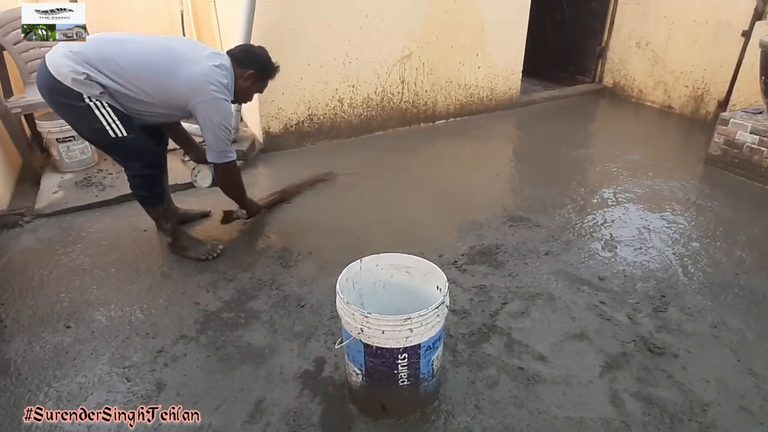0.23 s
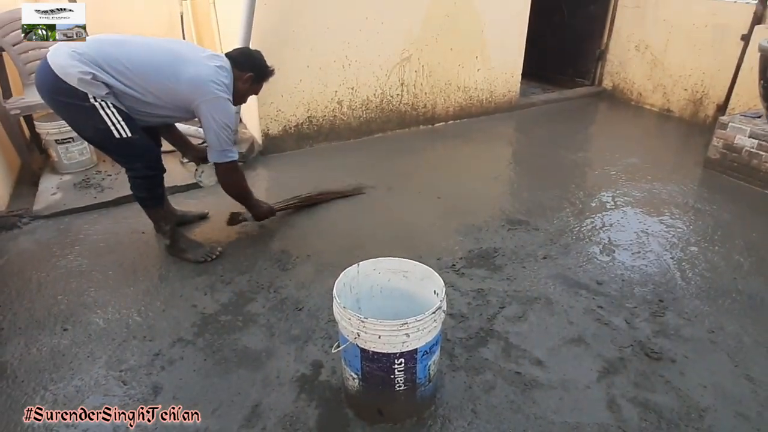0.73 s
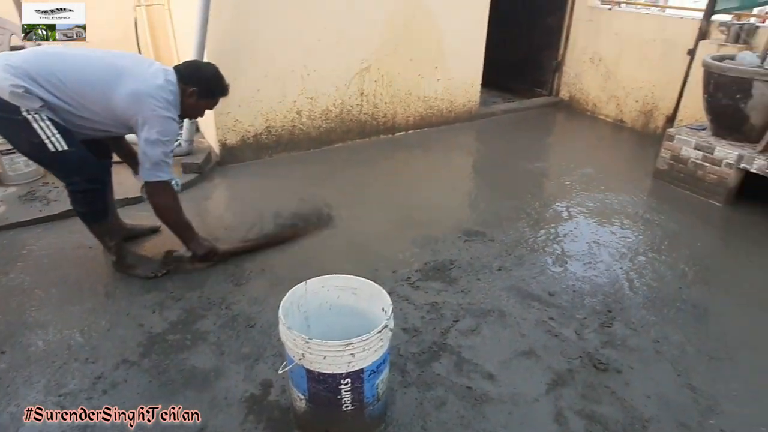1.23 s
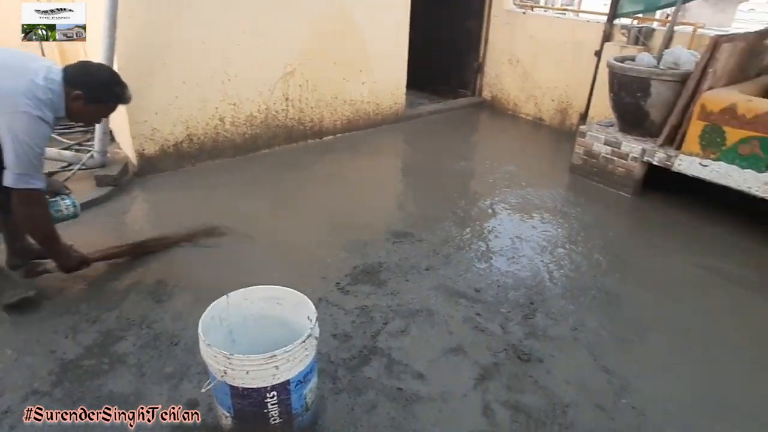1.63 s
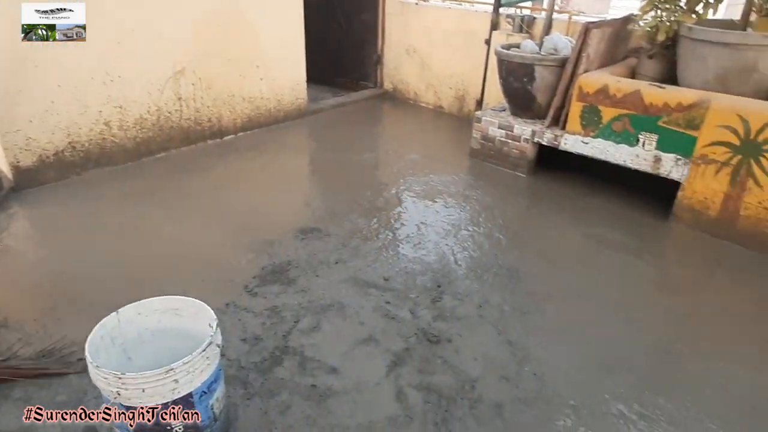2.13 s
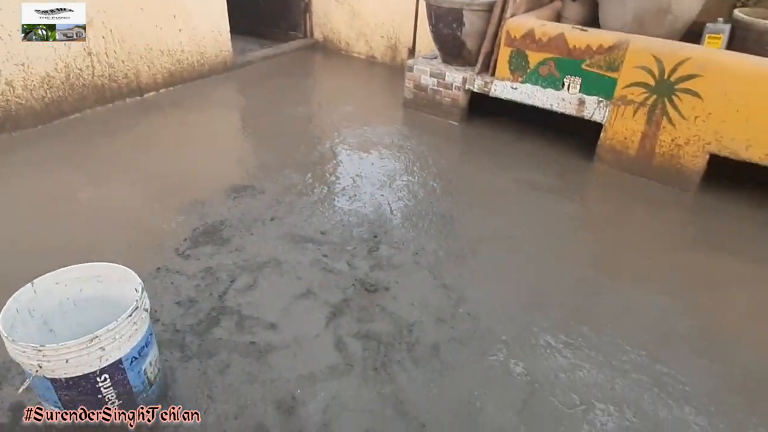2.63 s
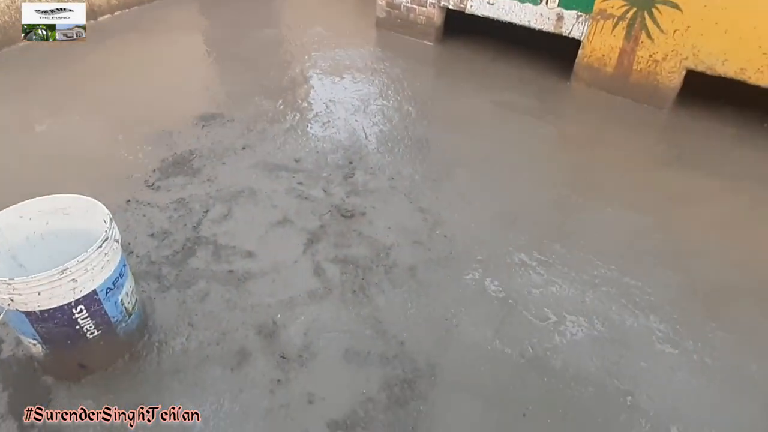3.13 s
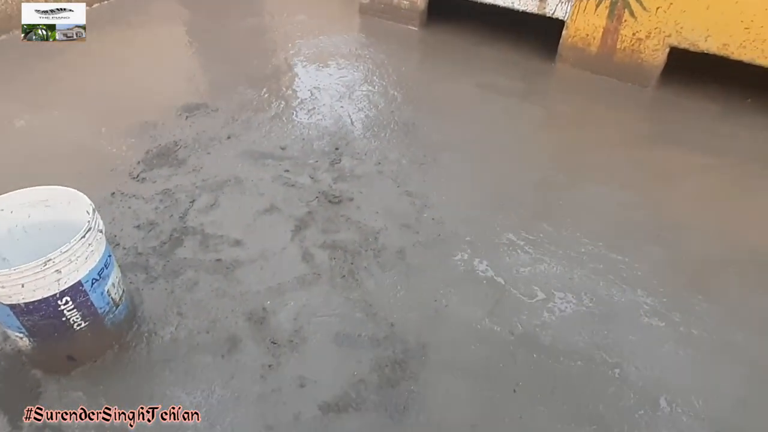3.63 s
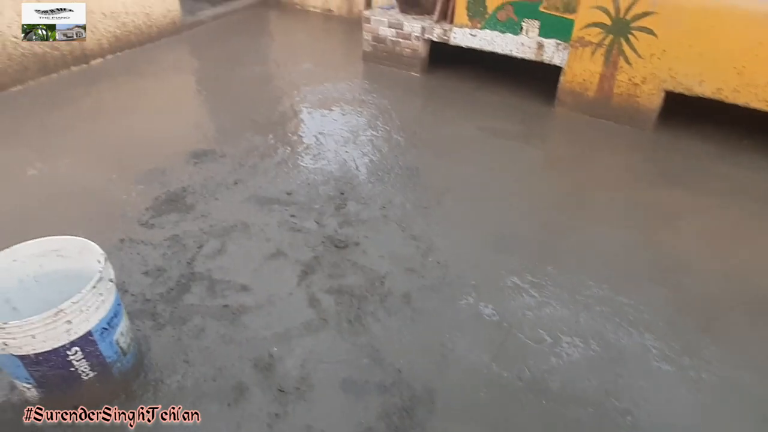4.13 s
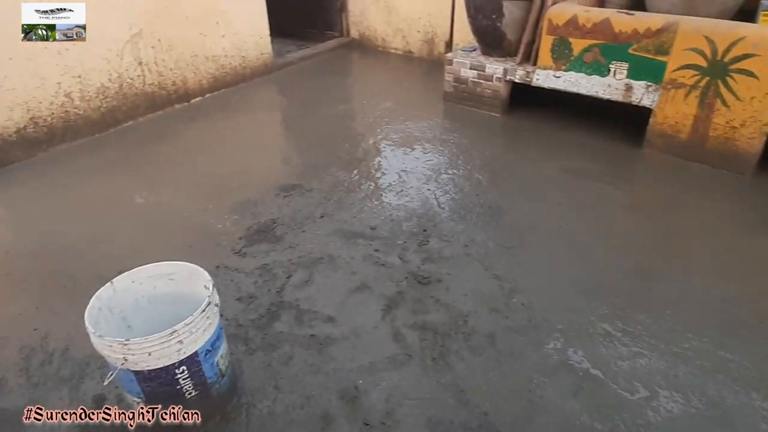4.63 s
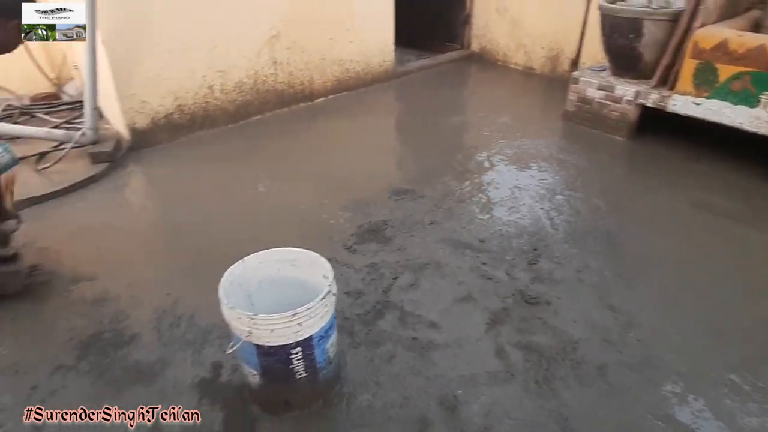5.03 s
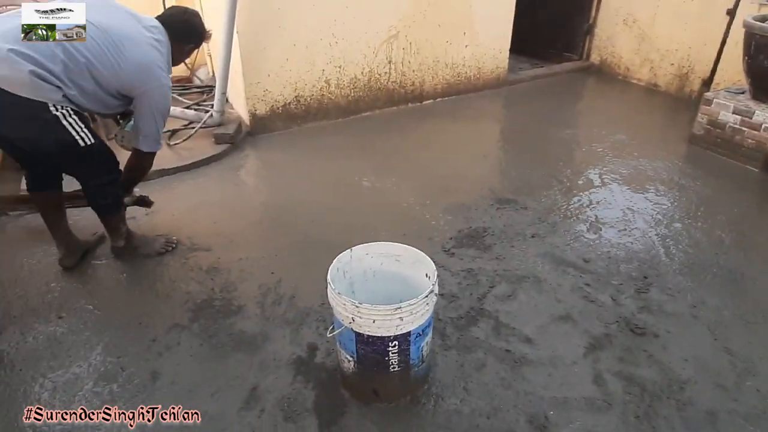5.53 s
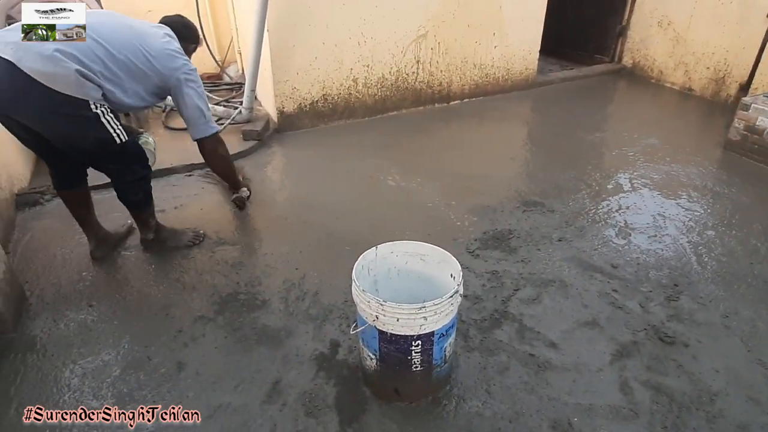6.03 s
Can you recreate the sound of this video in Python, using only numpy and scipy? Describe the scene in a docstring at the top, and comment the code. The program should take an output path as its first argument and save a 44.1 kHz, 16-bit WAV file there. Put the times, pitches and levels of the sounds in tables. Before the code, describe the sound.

Close to the left, a stiff twig broom sweeps wet cement slurry in regular raspy strokes with a watery swish, gurgle and small squelches. Sweeping stops, the broom slaps down once, sharp and dry, and tiny wet specks tick. A few more irregular strokes follow with splats. Town traffic rumbles faintly below; a distant engine drones, swelling near the end. Low walls add a brief outdoor echo.

```python
"""A stiff twig broom sweeps wet cement slurry over a walled roof terrace, mostly to the left.
From the start, town traffic rumbles below, made of filtered noise. Twigs scratch over grit (random tiny
impulses) and push a swishing, gurgling film of slurry (wavering resonances), with a few squelches.
In a pause at 3.6 s the broom slaps down once and wet specks tick; the walls answer briefly throughout.
Sweeping resumes at 4 s, when a distant engine (a stack of sines) rises; it swells again near the end."""
import sys
import numpy as np
from scipy import signal
from scipy.fft import rfft, irfft, next_fast_len
from scipy.io import wavfile
from scipy.ndimage import uniform_filter1d

SR = 44100
rng = np.random.default_rng(int(sys.argv[2]) if len(sys.argv) > 2 else 0)


def master_out(mix):
    """Clip the mix to full scale and print it as 16-bit PCM to the path in sys.argv[1]."""
    frames = np.transpose(np.atleast_2d(mix))
    ceiling = np.clip(frames, -1, 1)
    pcm = np.round(ceiling * 32767).astype(np.int16)
    wavfile.write(sys.argv[1], SR, pcm)


N = 277477
TIME = np.arange(N) / SR
EDGE_HZ = 16000  # top of the sound's band


def gain_of(db):
    """Turns decibels into amplitude."""
    return 10 ** (np.asarray(db) / 20)


def evened(x):
    """Scales a sound to an average strength (rms) of 1."""
    return x / np.sqrt(np.mean(x ** 2) + 1e-20)


def read(points, hz):
    """Reads a frequency table between its points, on a logarithmic frequency axis."""
    f, value = np.transpose(points)
    return np.interp(np.log(hz + 1), np.log(f + 1), value)


def follow(rows):
    """Draws each column of a time table as a curve over all samples."""
    s, *columns = np.transpose(rows)
    return [np.interp(TIME, s, column) for column in columns]


def filtered(x, gain):
    """Multiplies each frequency of x by gain(frequency)."""
    size = next_fast_len(N + 4096)
    spectrum = rfft(x, size)
    return irfft(spectrum * gain(np.fft.rfftfreq(size, 1 / SR)), size)[..., :N]


def coloured(x, points):
    """Gives x the spectrum of a table, keeping the power that white noise would have."""
    even_hz = np.linspace(0, EDGE_HZ, 2 ** 10)
    power = np.mean(gain_of(read(points, even_hz)) ** 2)
    shaped = filtered(x, lambda hz: gain_of(read(points, hz)) * (hz < EDGE_HZ))
    return shaped / np.sqrt(power * 2 * EDGE_HZ / SR)


def wander(hz):
    """A smooth random curve of rms 1; changes faster than about hz are filtered away."""
    return evened(filtered(rng.standard_normal(N), lambda f: 1 / (1 + (f / hz) ** 4)))


def resonate(x, hz, width):
    """A steep resonance, width in Hz, whose pitch follows the curve hz."""
    turn = np.exp(2j * np.pi * np.cumsum(hz * np.ones(N)) / SR)
    r = np.exp(-np.pi * width / SR)
    # shift the pitch down to zero, smooth there, and shift back up
    return (turn * signal.lfilter([(1 - r) ** 2], [1, -2 * r, r * r], x / turn)).real


def slips(per_s, spread_db):
    """Random tiny impulses of uneven size, each with its own strength on the left and on the right."""
    size = gain_of(spread_db * np.minimum(rng.exponential(1, N), 4))
    happens = rng.random(N) < per_s / SR
    return evened(size * happens * rng.standard_normal((2, N)))


def pops(per_s, spread_db, low_hz, high_hz, cycles, count=24):
    """Sparse short rings, each at one of count pitches, fading over a few cycles."""
    t, out = np.arange(2 ** 9) / SR, 0
    for hz in np.geomspace(low_hz, min(high_hz, EDGE_HZ), count):
        ring = evened(np.sin(2 * np.pi * hz * t) * np.exp(-t * hz / cycles))
        hits = slips(per_s / count, spread_db)
        out = out + signal.oaconvolve(hits, ring[None], axes=1)[:, :N]
    return evened(out)


def drifting(x, patchy_db):
    """Lets the colour shift in random patches some hundreds of Hz wide."""
    z = signal.stft(x, nperseg=512)[2]
    patches = rng.standard_normal(z.shape[1:])
    patches = uniform_filter1d(patches, size=6, axis=0)  # smooth over frequency
    patches = evened(uniform_filter1d(patches, size=9, axis=1))  # smooth over time
    return evened(signal.istft(z * gain_of(patchy_db * patches), nperseg=512)[1][:, :N])


def burst(s, db, rise, fall):
    """Envelope of many twigs or drops landing almost together."""
    distance = np.maximum((s - TIME) / rise, (TIME - s) / fall)
    return gain_of(db) * np.exp(-distance.clip(0, 40))


# colour of the traffic: (frequency [Hz], relative level [dB])
TOWN_COLOUR = [(20, -34.5), (40, -13.5), (58, -7), (80, 0.5), (128, -1.5), (158, -9.5), (195, -5),
               (320, -7), (450, -11.5), (750, -15.5), (1300, -21.5), (3500, -30.5), (4800, -39.5),
               (16000, -48.5)]
# how alike left and right are: (frequency [Hz], likeness [0-1])
TOWN_LIKENESS = [(60, 0.99), (130, 0.95), (280, 0.87), (500, 0.58), (800, 0), (16000, 0)]
# slow rise and fall of the traffic: (time [s], added level [dB])
TOWN_SWELL_CURVE = [(0, 4.5), (1.5, 3), (2.5, 1.5), (3.4, 1), (4.1, 3.5), (5.1, 1.5), (5.8, 8), (6.29, 5)]
TOWN_BASE_DB = -49.5  # before the swell is added


def town():
    """Far traffic: a rumble alike on both sides, with a thin unrelated hiss."""
    left, other = rng.standard_normal((2, N))
    same = lambda hz: np.clip(read(TOWN_LIKENESS, hz), 0, 1)
    right = filtered(left, same) + filtered(other, lambda hz: np.sqrt(1 - same(hz) ** 2))
    rumble = evened(coloured(np.array([left, right]), TOWN_COLOUR))
    lumps_db = 0.7 * wander(hz=6)
    return gain_of(TOWN_BASE_DB + follow(TOWN_SWELL_CURVE)[0] + lumps_db) * rumble


# the engine's course, before a slight waver: (time [s], firing rate [Hz], level [dB])
ENGINE_COURSE = [(0, 57.9, -68), (3.65, 56.06, -62), (3.85, 56.45, -50), (4.05, 57.26, -47),
                 (4.3, 53.45, -51), (4.6, 56.6, -49), (4.95, 54.24, -56.5), (5.27, 55.4, -57),
                 (5.45, 58.14, -40), (5.65, 60.64, -38), (5.9, 60.9, -40), (6.1, 58, -49),
                 (6.29, 55.66, -61)]
# overtones of the exhaust: (multiple of the firing rate, relative level [dB])
EXHAUST_TONES = [(1, 1.5), (2, -18), (3, -10.5), (4, -20), (5, -21), (6, -17.5)]


def engine():
    """A distant exhaust drones at multiples of its firing rate; the higher ones flutter more."""
    hz, db = follow(ENGINE_COURSE)
    turns = np.cumsum(hz * (1 + 0.0063 * wander(hz=14.2))) / SR
    drone = 0
    for multiple, tone_db in EXHAUST_TONES:
        flutter = 1 + 0.15 * multiple * wander(hz=3.3)
        tone = np.sin(2 * np.pi * (multiple * turns + rng.random()))
        drone = drone + gain_of(tone_db) * flutter * tone
    return gain_of(db) * evened(drone)


# how long echoes last: (frequency [Hz], time to fall by 60 dB [s])
TERRACE_DECAY = [(200, 0.43), (1500, 0.46), (5000, 0.22), (15000, 0.086)]


def terrace(x, wet_db):
    """Adds scattered echoes from the low walls, which die quickly under the open sky."""
    t = np.arange(SR // 2) / SR
    taps = rng.standard_normal((2, len(t))) * (1 - np.exp(-t / 0.014))
    hz, at, z = signal.stft(taps, SR, nperseg=256)
    fade_db = -60 * at / read(TERRACE_DECAY, hz)[:, None]
    tail = signal.istft(z * gain_of(fade_db), SR, nperseg=256)[1]
    echoes = signal.fftconvolve(x, tail / np.linalg.norm(tail[0]), axes=1)[:, :N]
    return x + gain_of(wet_db) * echoes


# lean of each pitch range: (frequency [Hz], left minus right [dB])
LEAN_COLOUR = [(300, -3.5), (1200, -4), (2400, 0.5), (4400, 2), (8000, 5.5), (10500, 2), (13000, 8)]
# slow change of the lean: (time [s], added left minus right [dB])
LEAN_TURN = [(0, 1), (1, 2.3), (2, 2), (2.8, 2.5), (4.3, 3.5), (4.8, 3.2), (5.8, 3)]


def from_left(x):
    """Places the work to the left: its treble is weaker on the right, and the lean slowly changes."""
    side = np.array([[1], [-1]]) / 2
    gains = lambda hz: gain_of(side * read(LEAN_COLOUR, hz))
    # divide by the average of both sides so that the colour of the whole stays
    shaded = filtered(x, lambda hz: gains(hz) / np.sqrt(np.mean(gains(hz) ** 2, axis=0)))
    return shaded * gain_of(side * follow(LEAN_TURN)[0])


# single sharp drops: (time [s], level before echo and lean [dB], pitch [Hz], ring time [s])
SHARP_DROPS = [(3.709, -31, 14000, .0003), (3.887, -36, 9050, .0001), (4.848, -17, 13700, 0.00025),
               (5.18, -24, 11000, 0.00021), (5.219, -18, 12340, 0.00013), (5.497, -39, 4700, 0.0006)]


def drops():
    """Each drop is a sine that rings for a few cycles."""
    out = np.zeros((2, N))
    for s, db, hz, ring in SHARP_DROPS:
        age = np.maximum(TIME - s, 0)
        out += gain_of(db) * np.sin(2 * np.pi * hz * age) * np.exp(-np.minimum(age / ring, 20))
    return out


# wet splats and twig flicks: (time [s], relative level [dB], fall [s])
SPLAT_EVENTS = [(2.222, -41, .003), (2.243, -40, .0047), (3.413, -48, .0069), (3.453, -47, 0.0038),
                (3.557, -47, .018), (3.708, -37.5, 0.012), (4.054, -45, .0055), (4.392, -35, .005),
                (4.530, -46, 0.013), (4.643, -27, 0.011), (4.887, -37, .01), (4.931, -42, .0032),
                (5.082, -50, .01), (5.091, -47.5, .018), (5.147, -45, .011), (5.163, -41.5, .009),
                (5.179, -41, 0.029), (5.235, -44.5, 0.0071), (5.490, -50, .012), (5.526, -53, .01),
                (5.550, -48.5, .02), (5.647, -35, .012), (6.222, -45, .009), (6.276, -46, .003)]
# colour of splats and crackle: (frequency [Hz], relative level [dB])
SPLAT_SPECTRUM = [(300, -21), (1200, -19), (2200, -14), (4000, -7.5), (7000, -7.5), (10000, -8),
                  (13000, -5.5), (16000, -10)]
# stirred slurry crackles: level under the stirring, decay time, level at rest
SETTLE_DB, SETTLE_S, STILL_DB = -22.5, 0.16, -79.5


def splats(stirring):
    """Small wet spatters, over the faint crackle of slurry settling after it is stirred."""
    level = sum(burst(s, db, 0.0015, fall) for s, db, fall in SPLAT_EVENTS)
    spatter = gain_of(-2.0) * level * slips(per_s=22000, spread_db=1.5)
    keep = np.exp(-1 / (SETTLE_S * SR))
    stirred = stirring + gain_of(10.5) * level
    settling = gain_of(SETTLE_DB) * signal.lfilter([1 - keep], [1, -keep], stirred)
    crackle = (gain_of(STILL_DB) + settling) * slips(per_s=3500, spread_db=0.5)
    return coloured(spatter + crackle, SPLAT_SPECTRUM)


# the blow, its echo off the wall, the thrown spray: (time [s], relative level [dB], rise [s], fall [s])
SLAP_PARTS = [(3.5943, -12, .0038, .004), (3.609, -24.5, .005, .01), (3.641, -40.5, .014, .032)]
# colour of the slap: (frequency [Hz], relative level [dB])
SLAP_SPECTRUM = [(100, -22), (250, -7), (480, -10.5), (700, -4), (950, -19), (1400, -10.5), (2300, -2.5),
                 (3300, -9), (4400, -2.5), (6600, -5.5), (8400, -4), (15000, -6), (16000, -34)]


def slap():
    """The whole bundle lands on the wet floor within a few milliseconds: bursts of dense impulses."""
    level = sum(burst(*row) for row in SLAP_PARTS)
    return coloured(level * slips(per_s=42000, spread_db=0.0), SLAP_SPECTRUM)


# twigs catching a thicker lump: (time [s], relative level [dB], pitch [Hz], width [Hz], half length [s])
SQUELCH_EVENTS = [(0.171, -35.5, 1100, 420, 0.031), (.86, -43, 1310, 700, .018),
                  (1.25, -31, 4640, 3500, 0.026), (1.968, -32, 2030, 450, .015),
                  (2.437, -40.5, 1600, 500, .04), (2.662, -40, 1760, 700, .025),
                  (3.075, -41, 1950, 600, .025)]


def squelches():
    """A lump of slurry rings briefly as the twigs tear through it."""
    tearing = slips(per_s=6000, spread_db=1.0)
    out = 0
    for s, db, hz, width, length in SQUELCH_EVENTS:
        swell = np.exp(-np.minimum(((TIME - s) / length) ** 2 / 2, 20))
        out = out + gain_of(db) * swell * evened(resonate(tearing, hz, width))
    return out


# a stroke swells from this level as the twigs bend, and sinks back to it as they lift
EDGE_DB, PRESS_SHAPE, LIFT_SHAPE = -15.5, 2.16, 2.12
# the first twigs graze before the landing, the last trail off after the lift
TOUCH_DB_PER_S, TRAIL_DB_PER_S = 430, 190
# losses per stroke length: level and fizz away from the fastest moment,
# swish and gurgle away from the wettest spot
SLOWING_DB, DULLING_DB = 4, 6
SWISH_DRAIN_DB, GURGLE_DRAIN_DB = 13.5, 12.5


def stroke(start, press, hold, lift, db, fizz_db, fastest,
           swish_hz, swish_db, gurgle_hz, gurgle_db, wettest):
    """One stroke: press, hold, lift; brightest where it is fastest, swishing where slurry is deepest."""
    age, length = TIME - start, press + hold + lift
    pressing = np.clip(1 - age / press, 0, 3)
    lifting = np.clip((age - press - hold) / lift, 0, 1)
    sag_db = EDGE_DB * (pressing ** PRESS_SHAPE + lifting ** LIFT_SHAPE)
    before, after = np.maximum(-age, 0), np.maximum(age - length, 0)
    off_floor_db = TOUCH_DB_PER_S * before + TRAIL_DB_PER_S * after
    along = np.clip(age / length, 0, 1)
    slower, drier = abs(along - fastest), abs(along - wettest)
    return (gain_of(db + sag_db - off_floor_db - SLOWING_DB * slower),
            fizz_db - DULLING_DB * slower,
            np.full(N, swish_hz), swish_db - SWISH_DRAIN_DB * drier,
            np.full(N, gurgle_hz), gurgle_db - GURGLE_DRAIN_DB * drier)


# broom strokes: (landing [s], press [s], hold [s], lift [s], relative level [dB], fizz share [dB],
#   fastest moment [0-1 of the stroke], swish pitch [Hz], relative swish [dB],
#   gurgle pitch [Hz], relative gurgle [dB], wettest spot [0-1 of the stroke])
BROOM_STROKES = [ (-.207, 0.084, .047, .142, -28, -9, .53, 2400, -6, 1050, -11, .37),
                 (.05, .103, .05, .255, -28, -6.7, .28, 2620, -3, 1080, -7, .32),
                 (0.458, .09, .027, .159, -28, -4.5, 0.48, 2870, 1, 1250, -11, 0),
                 (0.726, 0.088, 0.097, .131, -32.5, -7, 0.44, 2520, -1.5, 1211, -7, 0.39),
                 (1.049, 0.12, 0.098, .18, -25.5, -4.5, 0.58, 2360, -21, 1180, -12, 0.67),
                 (1.473, 0.12, 0.071, .181, -27.5, -4.5, .78, 1980, -8.5, 1234, -6, 0.17),
                 (1.861, .098, .105, .135, -25, -4, .35, 2070, -12, 1450, -18, .33),
                 (2.243, .078, .17, .128, -29, -5, .7, 2020, -3, 1320, -9, .43),
                 (2.611, 0.061, 0.11, 0.12, -26.5, -2, 0.6, 1980, -9.5, 1347, -19, 0),
                 (2.966, .078, .012, .165, -28.8, -4, .85, 1920, -7, 1350, -18, .46),
                 (4.054, .026, .005, 0.058, -38.5, -.5, 0.25, 2000, -13, 1250, -13, .5),
                 (4.127, 0.081, 0.041, 0.16, -27, 0, 0, 2040, -15, 1250, -16, 0.3),
                 (4.627, 0.022, 0.12, 0.068, -35.5, -1.5, 0.67, 2230, -18, 1230, -12.5, .16),
                 (4.792, .058, .032, .098, -49.5, -.5, .4, 2230, -9, 1240, -9, .5),
                 (5.639, 0.049, 0.045, 0.071, -31.5, -9, .63, 2480, -3, 1170, -24, .58),
                 (5.715, .087, .09, .175, -26, -8, .8, 2454, -7.5, 1150, -9, 0.28)]


def sweeping():
    """Level, fizz, swish and gurgle of all strokes; where they overlap, the louder weighs more."""
    power, colour = 1e-20, 0
    for row in BROOM_STROKES:
        level, *controls = stroke(*row)
        power = power + level ** 2
        colour = colour + level ** 2 * np.array(controls)
    return np.sqrt(power), *(colour / power)


# colour of twigs on grit: (frequency [Hz], relative level [dB])
SCRATCH_COLOUR = [(250, -22), (450, -10.5), (700, -11.5), (1000, -17), (1400, -13), (1800, -3),
                  (3000, -1.5), (4500, 0.5), (5600, -1.5), (7200, -4.5), (8400, -2.5), (10300, -7),
                  (11800, -1.5), (15000, -3.5), (16000, -12)]


def broom(level, fizz_db, swish_hz, swish_db, gurgle_hz, gurgle_db):
    """Twigs slip over grit in clumps, flick, and plough a film of slurry."""
    clumps = gain_of(0.49 * wander(hz=35) + 0.25 * wander(hz=260))
    grit = coloured(slips(per_s=22000, spread_db=-0.5), SCRATCH_COLOUR)
    flicks = pops(per_s=900, spread_db=1.0, low_hz=2450, high_hz=14500, cycles=2.1)
    # the bundle fans and bends as it moves, so its colour keeps shifting
    scratch = drifting(grit + gain_of(-14.5) * flicks, patchy_db=1.43)
    # fast, lightly pressed tips fizz; the bent shafts rasp lower
    fizz = filtered(scratch, lambda hz: 1 / (1 + (8500 / (hz + 1)) ** 4))
    share = np.clip(gain_of(fizz_db) ** 2, 0.03, 0.8)
    rasping = gain_of(2.5) * np.sqrt(1 - share) * evened(scratch - fizz)
    fizzing = gain_of(6.5) * np.sqrt(share) * evened(fizz)
    # air pockets in the ploughed slurry ring at a wavering pitch;
    # a thinner film rings higher and scatters its pitch more
    scatter = 0.57 * np.log(np.maximum(swish_hz / 2000, 1)) * wander(hz=507)
    swish_pitch = swish_hz * np.exp(scatter + 0.075 * wander(hz=24))
    swish = evened(resonate(slips(per_s=4000, spread_db=0.5), swish_pitch, width=480))
    gurgle_pitch = gurgle_hz * (1 + 0.067 * wander(hz=22))
    gurgle = evened(resonate(slips(per_s=2500, spread_db=2), gurgle_pitch, width=770))
    slurry = gain_of(swish_db) * swish + gain_of(gurgle_db) * gurgle
    slurry = filtered(slurry, lambda hz: 1 / (1 + (650 / (hz + 1)) ** 4))  # thin out the bass
    return gain_of(-3.5) * level * clumps * (rasping + fizzing + slurry)


def scene():
    """The work on the terrace over the sound of the town."""
    level, *colour = sweeping()
    strike = terrace(slap(), wet_db=-22)
    strokes = terrace(broom(level, *colour) + squelches(), wet_db=-16.0)
    specks = terrace(splats(level) + drops(), wet_db=-8.5)
    return town() + engine() + from_left(strokes + strike + specks)


def record(dry):
    """Removes everything above the top of the band with a steep low-pass filter."""
    low_pass = signal.firwin(511, EDGE_HZ, window=("kaiser", 9), fs=SR)
    return signal.oaconvolve(dry, low_pass[None], "same")


dry = scene()
out = record(dry)
master_out(out)
```